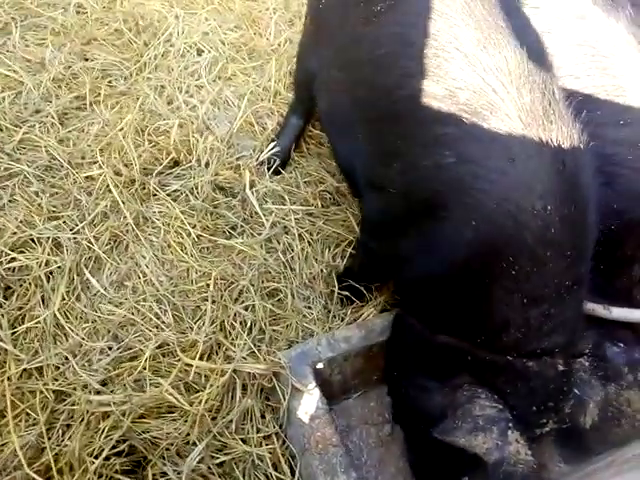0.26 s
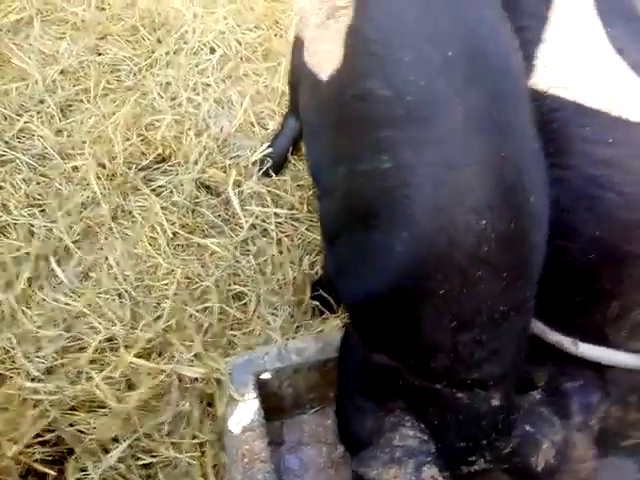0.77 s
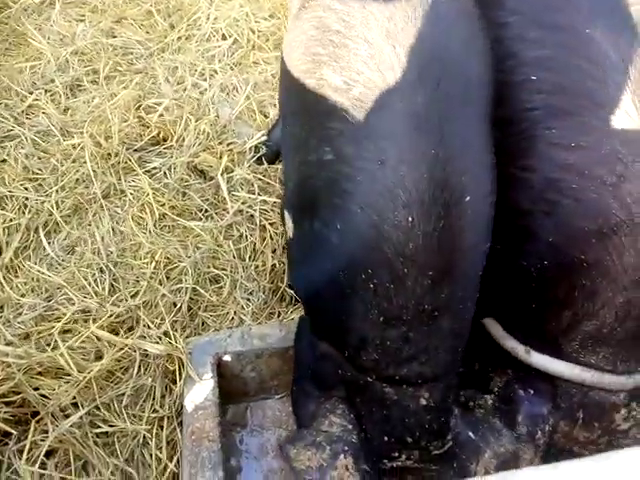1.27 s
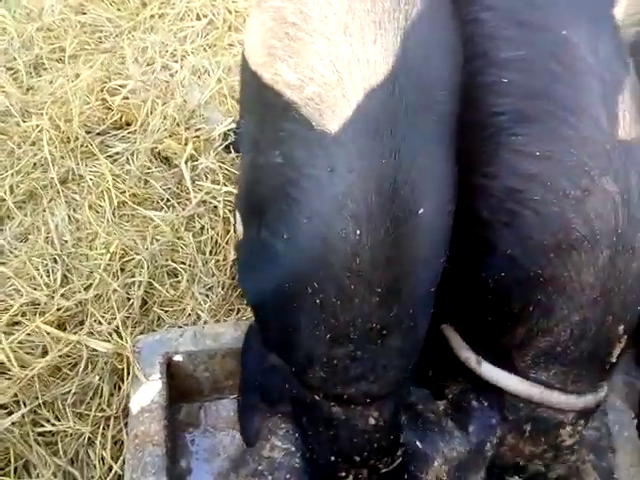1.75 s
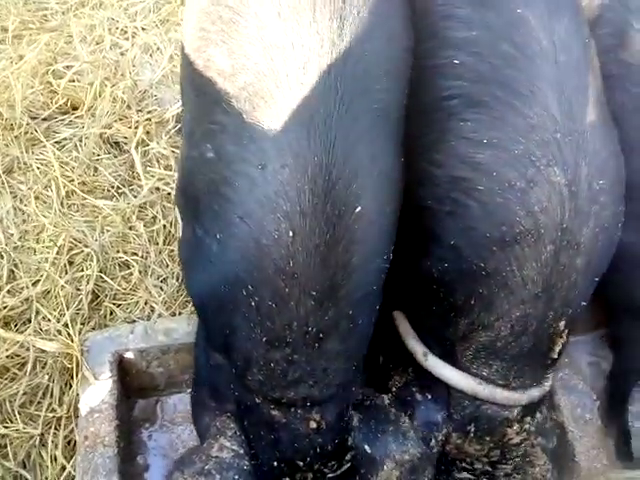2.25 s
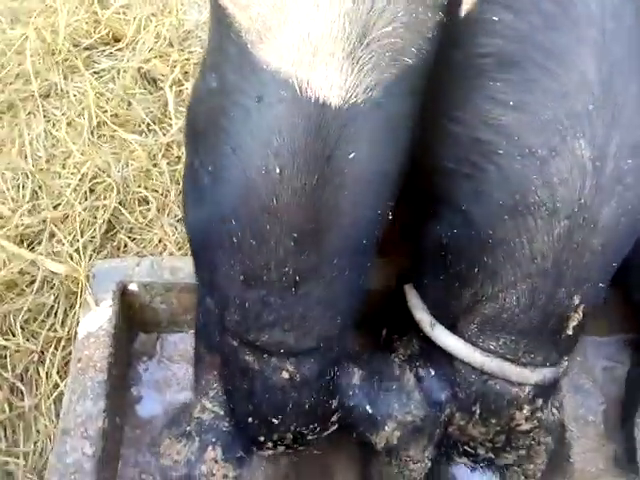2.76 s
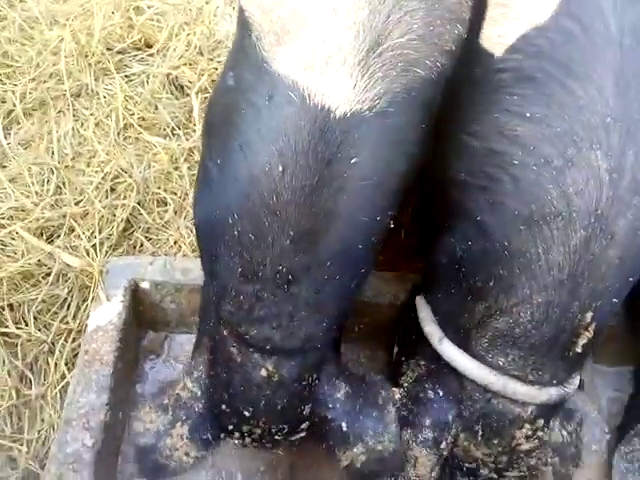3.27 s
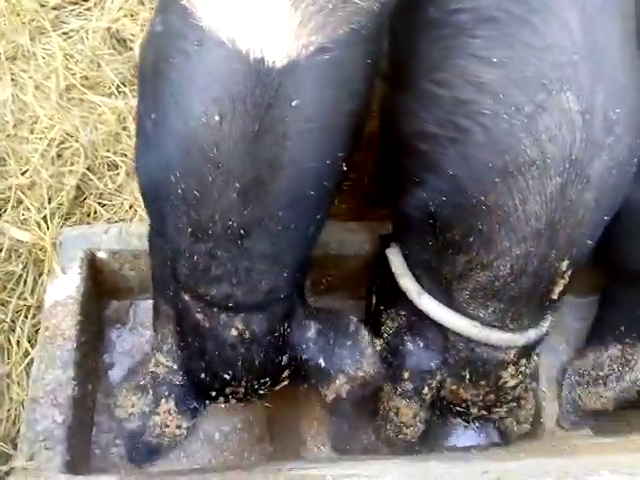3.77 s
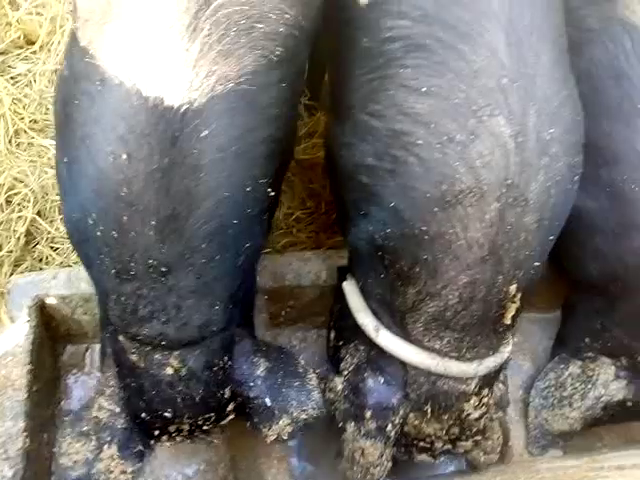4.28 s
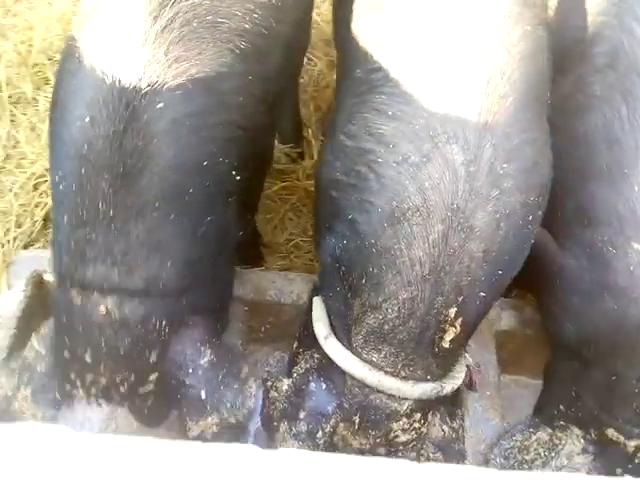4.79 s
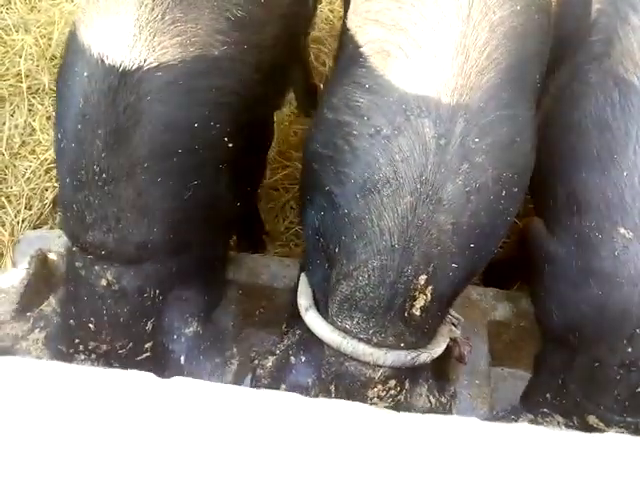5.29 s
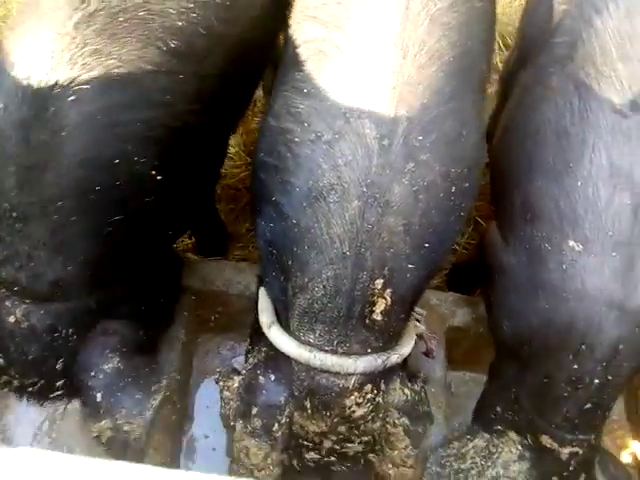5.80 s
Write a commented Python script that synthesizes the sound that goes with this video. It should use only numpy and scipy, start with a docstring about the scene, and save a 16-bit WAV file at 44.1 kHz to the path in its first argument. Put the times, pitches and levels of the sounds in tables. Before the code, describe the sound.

Wet, open-mouthed chewing by pigs, heard very close. It starts at once with a smack and slurp, stays sparse at first, then turns into strong dull chomps, sticky smacks, tiny squeaky whistles and sharp spits. A brief grunt sounds halfway, then the eating continues with lighter smacks. Beneath is a soft low rumble of snouts and bodies, a short pen echo and faint microphone hiss.

```python
"""Right away a jaw closes with a hollow pop and a wet smack: pigs feed on mash from a concrete trough. More
pops, dull knocks and smacks follow, with spits, whistles and one grunt, mostly fading tones. Mash slurps and
bubbles: air noise and many tiny tones swell with each mouthful; spray hisses along. Behind lie a faint echo of
the open pen, a low murmur of snouts and bodies made from coloured noise, the steady hiss of a small, close
microphone and a very faint flicker at the top of the treble."""
import sys
import numpy as np
from scipy import signal
from scipy.fft import rfft, irfft, next_fast_len
from scipy.io import wavfile
from scipy.ndimage import uniform_filter1d, map_coordinates

SR = 44100
rng = np.random.default_rng(int(sys.argv[2]) if len(sys.argv) > 2 else 0)


def dump_mix(stems):
    """Bounce the given channels to the path in sys.argv[1] as a 16-bit WAV at rate SR."""
    frames = np.atleast_2d(stems).T  # one column per channel
    limited = np.clip(frames, -1, 1)  # hard clip at full scale
    pcm = np.round(limited * 32767).astype(np.int16)
    wavfile.write(sys.argv[1], SR, pcm)


def volts_from_db(level):
    """Convert decibel levels to linear amplitude ratios."""
    exponent = np.asarray(level, float) / 20
    return 10 ** exponent


N = 266364  # length in samples


def unit(x):
    """Scaled to rms 1."""
    return x / np.sqrt(np.mean(x ** 2) + 1e-20)


def along(points, hz):
    """Reads a curve of (Hz, value) points on a log frequency axis."""
    f, v = np.transpose(points)
    return np.interp(np.log(hz + 1), np.log(f + 1), v)


def curves(rows):
    """One value per sample for each column after the time."""
    s, *cols = np.transpose(rows)
    return [np.interp(np.arange(N) / SR, s, c) for c in cols]


def wobble(rate):
    """A smooth random curve with rate random points a second."""
    points = rng.standard_normal(int(N * rate / SR) + 4)
    return map_coordinates(points, [np.arange(N) * rate / SR])


def filtered(x, response):
    """Multiplies the spectrum of x by a response that depends on frequency."""
    m = next_fast_len(N + SR // 2)
    return irfft(rfft(x, m) * response(np.fft.rfftfreq(m, 1 / SR)), m)[:N]


def noise(spectrum):
    """Noise of rms 1 with the given colour."""
    return unit(filtered(rng.standard_normal(N), lambda hz: volts_from_db(along(spectrum, hz))))


def tract(x, modes):
    """Sends x through fixed resonances side by side, with alternating sign."""
    def response(f):
        total = 0
        for k, (centre, width, db) in enumerate(modes):
            peak = 1j * f * width / (centre ** 2 - f ** 2 + 1j * f * width)
            total = total + (-1) ** k * volts_from_db(db) * peak
        return total
    return filtered(x, response)


def impulses(s, db):
    """Single-sample clicks at the given times and levels."""
    return np.bincount(np.round(s * SR).astype(int), volts_from_db(db), N)[:N]


def rings(rows, attack, rise, rough, bend=1):
    """Fading tones from rows (s, peak dB, Hz, t60 s); pitch rises as the cavity shrinks, wet walls shake the phase.
    With bend over 1 the tone holds at first, then dies quickly."""
    s, db, hz, t60 = np.transpose(rows)[:, :, None]
    t = np.arange(round(1.2 * t60.max() * SR)) / SR
    shake = np.cumsum(rng.standard_normal((len(s), len(t))), axis=1) * rough * np.sqrt(hz / SR)
    shake = uniform_filter1d(shake, size=24, axis=1)  # smoothed so that each tone stays narrow
    tone = np.sin(2 * np.pi * hz * t * (1 + rise * t / t60) + shake - shake[:, :1])
    shape = volts_from_db(-60 * (t / t60) ** bend) * (1 - np.exp(-t / attack)) ** 2
    shape = volts_from_db(db) * shape / shape.max(axis=1, keepdims=True)
    at = (np.round(s * SR) + np.arange(len(t))).astype(int)
    return np.bincount(at.ravel(), (tone * shape).ravel(), N + SR)[:N]


# Colour of the murmur. Each row: frequency in Hz, relative strength in dB per Hz.
MURMUR = [(25, -28.5), (42, -25.5), (70, -4), (145, 3), (233, -1), (460, -20.5), (600, -41.5), (780, -53.5),
          (1320, -120)]
# Loudness of the murmur over time. Each row: time in seconds, level in dB.
HERD = [(0.0, -60), (0.3, -61), (0.47, -62), (0.67, -53), (0.99, -61.5), (1.31, -59), (1.7, -61.5),
        (1.96, -67.5), (2.45, -65), (2.59, -59.5), (3.11, -58), (3.87, -62), (4.44, -63.5), (4.61, -56),
        (5.01, -60), (5.32, -56), (6.04, -64)]


def murmur():
    """Snouts and bodies of the herd blur into low noise that wavers and follows a loudness curve."""
    wavering = unit(volts_from_db(3.5 * wobble(11)) * noise(MURMUR))
    return volts_from_db(curves(HERD)[0]) * wavering


# How long the echo lasts. Each row: frequency in Hz, time to die by 60 dB in seconds.
PEN = [(150, 0.3), (400, 0.14), (1000, 0.054), (4000, 0.062)]


def pen(x):
    """Trough and pen walls answer; each frequency dies at its own speed, with a new tail every 1/8 second."""
    wet, hop = np.zeros(N + SR), SR // 8
    for start in range(0, N, hop):
        hz, t, z = signal.stft(rng.standard_normal(SR // 3), SR, nperseg=256)
        fade = volts_from_db(-60 * t / along(PEN, hz)[:, None])
        tail = signal.istft(z * fade, SR, nperseg=256)[1]
        tail = np.pad(tail, (round(0.018 * SR), 0))  # the echo starts 18 ms late
        echo = signal.fftconvolve(x[start:start + hop], tail / np.linalg.norm(tail))
        wet[start:start + len(echo)] += echo
    return wet[:N]


def licks():
    """Faint laps of the other mouths at random moments, each lingering on one mouth shape."""
    per_second, floor_db, spread_db, tilt_db_per_octave = 60, -70, 11, -3
    draw = rng.random((round(per_second * N / SR), 4))
    octaves = 3 * draw[:, 1]
    db = floor_db + spread_db * draw[:, 2] ** 2 + tilt_db_per_octave * octaves
    rows = [draw[:, 0] * N / SR, db, 450 * 2 ** octaves, 0.055 + 0.08 * draw[:, 3]]
    return rings(np.transpose(rows), attack=0.008, rise=0.02, rough=0.45)


# Resonances of the throat. Each row: centre in Hz, width in Hz, relative strength in dB.
THROAT = [(330, 100, -2.5), (478, 65, 0), (1400, 240, -10), (1800, 120, -11)]


def grunt():
    """A short voiced grunt: a hum, and uneven glottal pulses with breath through the throat."""
    peak_s, level_db, swell_s, fade_s = 3.122, -39, 0.04, 0.035
    peak_hz, sag_hz_per_s, rasp_db = 158.6, 220, -5.5
    late = np.arange(N) / SR - peak_s
    pitch_hz = peak_hz - sag_hz_per_s * np.clip(late, -swell_s / 2, fade_s / 2)
    phase = np.cumsum(pitch_hz * (1 + 0.0167 * wobble(180))) / SR  # in cycles
    pulses = np.diff(np.floor(phase), prepend=0) * volts_from_db(2.6 * wobble(150))
    hoarse = 0.085 * rng.standard_normal(N) * (1 + np.cos(2 * np.pi * phase))
    hum = np.sqrt(2) * np.sin(2 * np.pi * phase)
    rasp = volts_from_db(rasp_db) * unit(tract(pulses + hoarse, THROAT))
    bell = np.exp(-(late / np.where(late < 0, swell_s, fade_s)) ** 2)
    return volts_from_db(level_db) * bell * (hum + rasp)


# Mouthfuls sucked in. Each row: peak time in seconds, slurp level in dB, spray level in dB,
# swell in seconds, fade in seconds; the slurp climbs or falls 20 dB in the swell or fade time.
SLURPS = [(0.033, -42.5, -55, 0.04, 0.025), (0.301, -50, -62.5, 0.0091, 0.082),
          (0.71, -60.5, -80, 0.086, 0.24), (0.992, -49.5, -64, 0.085, 0.1),
          (1.385, -50.5, -67, 0.065, 0.13), (1.78, -47.5, -64, 0.08, 0.11),
          (2.078, -43, -62.5, 0.054, 0.073), (2.862, -44.5, -59, 0.021, 0.051),
          (3.13, -49.5, -62.5, 0.055, 0.29), (3.275, -69, -59, 0.0091, 0.036),
          (3.394, -62, -64.5, 0.026, 0.3), (3.67, -52, -63, 0.059, 0.0615), (3.714, -47, -54, 0.063, 0.043),
          (3.971, -53.5, -70, 0.0056, 0.15), (4.05, -52, -60, 0.017, 0.16), (4.375, -61, -65, 0.064, .15),
          (4.46, -50.5, -79, 0.065, 0.14), (4.665, -59, -73, 0.024, 0.45),
          (4.752, -50.5, -62, 0.029, 0.045), (4.849, -51.5, -63, 0.054, 0.041),
          (5.029, -60, -68, 0.0071, 0.12), (5.195, -57, -90, 0.083, 0.025),
          (5.27, -51, -74.5, 0.026, 0.023), (5.385, -57, -70, 0.022, 0.069),
          (5.735, -48, -76, 0.024, 0.082), (5.79, -49, -76, 0.067, 0.039)]
# Levels between mouthfuls: slurp in dB, then spray in dB.
REST_DB = [-75, -81.5]


def mouthfuls():
    """Slurp and spray levels in dB: each mouthful swells and fades over a resting level."""
    s, slurp_db, spray_db, swell, fade = np.transpose(SLURPS)[:, :, None]
    t = np.arange(0, N / SR, 0.002)

    def level(db, rest_db, lead_s, quicker):
        late = quicker * (t - s + lead_s)
        each = db - 20 * np.maximum(-late / swell, late / fade)
        return 20 * np.log10(volts_from_db(each).sum(axis=0) + volts_from_db(rest_db))

    slurp_level = level(slurp_db, REST_DB[0], lead_s=0, quicker=1)
    spray_level = level(spray_db, REST_DB[1], lead_s=0.0078, quicker=1.63)  # earlier and briefer
    return curves(np.transpose([t, slurp_level, spray_level]))


# Colour of the spray. Each row: frequency in Hz, relative strength in dB per Hz.
SPRAY = [(1470, -14), (2500, 0.5), (3380, -12.5), (4000, -6.5), (4910, -5.5), (9500, -20.5), (20900, -120)]


def spray(level_db):
    """Hiss through the teeth, each band flickering on its own, and small droplets that ring."""
    z = signal.stft(noise(SPRAY), nperseg=256)[2]
    field = uniform_filter1d(rng.standard_normal(z.shape), size=3, axis=0)
    field = uniform_filter1d(field, size=6, axis=1)
    hiss = signal.istft(z * volts_from_db(4.2 * unit(field)), nperseg=256)[1][:N]
    hiss = unit(volts_from_db(2.5 * wobble(66)) * hiss)
    draw = rng.random((1200, 3))
    hz = 2000 * 3 ** draw[:, 1]
    db = along(SPRAY, hz) - 4 * np.log(np.maximum(draw[:, 2], 0.05))  # a few drops are much louder
    rows = [draw[:, 0] * N / SR, db, hz, 110 / hz]
    drops = rings(np.transpose(rows), attack=0.002, rise=0.01, rough=0.2)
    return volts_from_db(level_db) * (volts_from_db(-3) * hiss + volts_from_db(-3) * unit(drops))


# Resonances of the snout. Each row: centre in Hz, width in Hz, relative strength in dB.
SNOUT = [(385.6, 202, 6.5), (637, 260, 2), (977, 320, 0.5), (1250, 207, 2.5), (1800, 400, -1),
         (2230, 290, -15.5), (2587, 300, -21)]


def breath(rate, patchy_db):
    """Air in the snout; each steep resonance swells and fades on its own as the tongue moves."""
    air = np.zeros(N)
    for centre, width, db in SNOUT:
        once = tract(rng.standard_normal(N), [(centre, width, db)])
        band = tract(once, [(centre, width, 0)])  # twice through makes it steep
        air += volts_from_db(patchy_db * wobble(rate)) * band
    return unit(air)


def slurp(level_db):
    """Mash sucked through the lips: dense small bubbles and air, coloured by the snout."""
    count = 3000
    draw = rng.random((count, 3))
    modes = np.array(SNOUT)[(draw[:, 1] * len(SNOUT)).astype(int)]
    hz = np.clip(modes[:, 0] + 0.5 * modes[:, 1] * rng.standard_normal(count), 250, None)
    size_db = modes[:, 2] - 3 * np.log(np.maximum(draw[:, 2], 0.08))
    rows = [draw[:, 0] * N / SR, size_db, hz, 22 / hz]
    bubbles = rings(np.transpose(rows), attack=0.008, rise=0.051, rough=0.31)
    air = breath(rate=28, patchy_db=4)
    return volts_from_db(level_db) * (volts_from_db(-9.5) * unit(bubbles) + volts_from_db(-6.5) * air)


# Spits of air and feed through the teeth. Each row: start in seconds, peak level in dB, centre in Hz.
SPITS = [(0.027, -57, 2410), (0.305, -58, 6660), (0.306, -60, 2480), (0.707, -58, 7080),
         (0.975, -58.5, 2560), (2.0342, -54.5, 5500), (2.053, -53.5, 3740), (2.073, -64, 3800),
         (2.4526, -59, 5900), (2.86, -56.5, 3775), (3.119, -62, 4730), (3.194, -55, 5190),
         (3.196, -61, 7930), (3.2507, -50, 4880), (3.252, -56, 3700), (3.3745, -47.5, 4150),
         (3.415, -60, 3470), (3.673, -55.5, 5300), (4.004, -54, 4850), (4.0377, -50.5, 4860),
         (4.045, -66, 2650), (4.178, -61.5, 3300), (4.329, -60.5, 4980), (4.359, -60, 2597),
         (4.452, -58, 7350), (4.464, -53, 7040), (4.802, -65, 7500), (5.0236, -58.5, 4530),
         (5.026, -66, 2800), (5.679, -60.5, 2845), (5.7075, -60, 5130), (5.733, -62.5, 7130),
         (5.757, -63.5, 4420), (5.937, -63.5, 4750), (6.027, -66, 4800)]


def spits():
    """Short rough whistles through the teeth: fainter side tones, a broad crack and a thin lingering tone."""
    side_hz = rng.uniform(1800, 8500, (len(SPITS), 6))  # six side tones at random pitches
    sides = [(s, db - 11.5, hz, 0.035) for (s, db, _), row in zip(SPITS, side_hz) for hz in row]
    main = [(s, db, hz, 0.04) for s, db, hz in SPITS]
    short = rings(main + sides, attack=0.003, rise=0.0082, rough=0.4, bend=1.3)
    thin = [(s, db - 14.5, hz, 0.16) for s, db, hz in SPITS]
    linger = rings(thin, attack=0.0044, rise=0.005, rough=0.15)
    s, db, _ = np.transpose(SPITS)
    t = np.arange(SR // 10) / SR
    burst = volts_from_db(-60 * t / 0.045) * (1 - np.exp(-t / 0.004)) ** 2
    crack = signal.fftconvolve(impulses(s, db - 9), burst)[:N]
    bright_noise = unit(np.diff(rng.standard_normal(N + 1)))
    return short + linger + crack * bright_noise


# Air squeezed between closed lips sings for a moment. Each row: start in seconds, peak level in dB,
# starting pitch in Hz, time to die by 60 dB in seconds.
WHISTLES = [(1.674, -45, 1300, 0.044), (2.285, -65.5, 890, 0.16), (2.758, -43, 1780, 0.024),
            (3.385, -54, 1192, 0.039), (3.953, -51, 1257, 0.04), (4.113, -46.5, 2700, 0.024),
            (4.13, -65, 1180, 0.1), (4.174, -63, 2074, 0.06), (4.829, -49.5, 1800, 0.08),
            (4.85, -50, 1520, 0.031), (5.162, -58, 1656, 0.034)]


def whistles():
    """Squeezed air sings as brief tones that hold, then die quickly."""
    return rings(WHISTLES, attack=0.0024, rise=0.012, rough=0.4, bend=2.5)


# Lip smacks. Each row: start in seconds, low tone's peak level in dB and starting pitch in Hz,
# high tone's peak level in dB and starting pitch in Hz.
SMACKS = [(0.031, -45, 890, -49, 1530), (0.301, -44, 960, -54, 1950), (0.71, -44, 913, -54, 1600),
          (0.931, -46, 840, -86.5, 1730), (0.98, -48.5, 750, -55, 1940), (1.034, -49.5, 806, -60, 1950),
          (1.377, -31.5, 943, -75, 1750), (1.419, -44, 1080, -50.5, 2180),
          (1.763, -37.5, 1169, -51.5, 1480), (1.775, -34, 1155, -48.5, 2230),
          (2.055, -34.5, 644, -43, 1287), (2.094, -46.5, 990, -50, 1500), (2.454, -59, 1165, -55, 1987),
          (2.475, -35, 713, -49.5, 1255), (2.518, -41, 598.5, -59, 1400), (2.796, -49, 1340, -49.5, 1840),
          (2.85, -48.5, 800, -52, 1690), (2.858, -46, 1056, -50, 1774), (3.113, -54, 1320, -50, 1740),
          (3.135, -44, 1400, -50, 2360), (3.198, -45, 1260, -62, 1650), (3.221, -47, 1025, -62, 1800),
          (3.251, -46.5, 800, -50.5, 2410), (3.266, -35.5, 1019, -45.5, 1665),
          (3.329, -54, 1250, -58, 1900), (3.374, -53, 1125, -51, 2085), (3.412, -55, 1250, -53, 2100),
          (3.613, -50.5, 945, -57, 2100), (3.658, -49, 1176, -56, 2070), (3.695, -59, 1200, -48.5, 2090),
          (4.046, -37.5, 1270, -51, 1982), (4.057, -46, 1187, -47, 1720), (4.202, -48.5, 940, -67, 1710),
          (4.357, -48.5, 1240, -52.5, 1700), (4.381, -46.5, 1292, -54, 1980),
          (4.449, -69, 720, -37.5, 1790), (4.466, -41.5, 866, -41.5, 1765), (4.466, -43, 1250, -46.5, 2240),
          (4.652, -50, 1860, -59, 2300), (4.712, -58, 1180, -54, 1770), (4.746, -33.5, 943, -56, 1670),
          (4.847, -49.5, 1150, -44.5, 1803), (4.859, -48, 990, -61, 1400), (5.035, -47, 1250, -54.5, 1617),
          (5.11, -49.5, 812, -47.5, 1493), (5.193, -49, 1070, -50.5, 1585), (5.253, -52.5, 1300, -73, 2000),
          (5.28, -55, 790, -55, 1276), (5.374, -51.5, 770, -57.5, 1570), (5.392, -57, 1100, -59, 2000),
          (5.473, -47.5, 733, -81, 1910), (5.619, -56, 956, -60, 1900), (5.673, -48.5, 1550, -54, 2090),
          (5.714, -42.5, 898, -56, 1880), (5.731, -47, 800, -49, 1480), (5.751, -44.5, 840, -59, 1500),
          (5.774, -49, 1230, -46, 1700), (5.8, -44, 1197, -58, 1980), (6.013, -56, 1160, -60, 1800)]


def smacks():
    """Each wet smack of the lips rings two snout resonances."""
    s, low_db, low_hz, high_db, high_hz = np.transpose(SMACKS)
    low_rows = np.transpose([s, low_db, low_hz, 19 / low_hz])
    high_rows = np.transpose([s, high_db, high_hz, 40 / high_hz])
    low = rings(low_rows, attack=0.00072, rise=0.015, rough=0.45, bend=1.15)
    high = rings(high_rows, attack=0.002, rise=0.02, rough=0.45, bend=1.5)
    return low + high


def squelches():
    """The lips tear from the mash at each smack or whistle: a short puff of air through the snout."""
    smack_s, low_db, _, high_db, _ = np.transpose(SMACKS)
    whistle_s, whistle_db, _, _ = np.transpose(WHISTLES)
    s = np.concatenate([smack_s, whistle_s])
    db = np.concatenate([np.maximum(low_db, high_db), whistle_db])
    t = np.arange(SR // 10) / SR
    puff = volts_from_db(-60 * t / 0.051) * (1 - np.exp(-t / 0.0026))
    puffs = signal.fftconvolve(impulses(s, db), puff)[:N]
    return volts_from_db(-9) * puffs * breath(rate=120, patchy_db=4)


# Snout knocks on the trough. Each row: start in seconds, peak level in dB, starting pitch in Hz.
KNOCKS = [(2.073, -24, 248), (2.093, -34, 270), (2.103, -36.5, 242.7)]


def knocks():
    """Short dull knocks of a snout on the trough that die within about four cycles, without rebounds."""
    rows = [(s, db, hz, 4.1 / hz) for s, db, hz in KNOCKS]
    return rings(rows, attack=0.0017, rise=0.016, rough=0.1, bend=2.0)


# Jaw closures. Each row: start in seconds, peak level in dB, starting pitch of the mouth cavity in Hz.
CHOMPS = [(0.027, -39.5, 550), (0.307, -37, 272), (0.694, -39, 378), (0.708, -27.5, 282),
          (0.846, -43.5, 206), (0.974, -46, 321.6), (1.008, -46, 262), (1.373, -40.5, 205),
          (1.3769, -33.5, 397.3), (1.405, -38.5, 318), (1.418, -48, 383), (1.764, -40, 281),
          (1.777, -23.5, 270), (1.799, -31.5, 299), (2.053, -27, 290), (2.453, -42, 290), (2.476, -26, 354),
          (2.531, -44, 330), (2.865, -19, 302.6), (3.268, -26, 279), (3.357, -46, 310), (3.663, -45, 306),
          (3.708, -44.5, 520), (4.047, -31.5, 473), (4.448, -32.5, 308), (4.467, -21.5, 285.4),
          (4.662, -45, 233), (4.745, -33.5, 526), (4.745, -39, 232.8), (4.878, -42.5, 230),
          (5.11, -42.5, 317), (5.263, -38.5, 311), (5.276, -41, 243.7), (5.714, -41.5, 250)]


def pops():
    """The mouth cavity pops as the jaws close; the cheeks slap twice more, weaker each time."""
    rebound_s, rebound_loss_db, detune = 0.019, 12, 0.055
    cycles = 10  # a pop dies by 60 dB within about this many cycles
    chance = rng.standard_normal((len(CHOMPS), 3, 3))
    rows = []
    for (s, db, hz), draws in zip(CHOMPS, chance):
        for k, (timing, pitch, force) in enumerate(draws):  # k = 0 is the pop itself, left as listed
            slap_s = s + k * rebound_s * (1 + 0.133 * timing)
            slap_db = db - k * rebound_loss_db + min(k, 1) * 2 * force
            slap_hz = hz * (1 + k * detune * pitch)
            rows.append((slap_s, slap_db, slap_hz, cycles / slap_hz))
    return rings(rows, attack=0.0015, rise=0.04, rough=0.28, bend=1.59)


def scene():
    """All mouths, their echo, and the low murmur of the herd."""
    slurp_db, spray_db = mouthfuls()
    mouths = licks() + grunt() + spray(spray_db) + slurp(slurp_db)
    mouths += spits() + whistles() + smacks() + squelches() + knocks() + pops()
    return (murmur() + volts_from_db(-13.5) * pen(mouths) + mouths)[None]


# Colour of the faint top treble. Each row: frequency in Hz, relative strength in dB per Hz.
TOP_TREBLE = [(13500, -40), (14300, -4), (15200, 1), (15600, -4.5), (15800, -42)]


def top_treble():
    """A very faint band of noise near 15 kHz whose level flickers."""
    level_db = -86.5 + 1.2 * wobble(9.2) + 1.2 * wobble(66)
    return volts_from_db(level_db) * noise(TOP_TREBLE)


# Response of the microphone. Each row: frequency in Hz, gain in dB.
MIC = [(25, -9.5), (45, -4), (70, 5.5), (6800, -9), (8200, -13.5), (10000, -11.5), (13600, -23.5),
       (15000, -6)]
# Colour of its hiss. Each row: frequency in Hz, relative strength in dB per Hz.
HISS = [(25, -1.5), (100, 1), (300, -3.5), (1000, -16.5), (3000, -20), (6000, -21.5), (7200, -26.5),
        (8200, -33.5), (13800, -33.5), (15600, -34), (15800, -64)]


def microphone(dry):
    """The microphone weakens deep bass and treble and adds a steady hiss."""
    heard = filtered(dry[0], lambda hz: volts_from_db(along(MIC, hz)))
    return heard + volts_from_db(-67.5) * noise(HISS)


def top_cut(x):
    """Nothing passes above the cut-off."""
    return signal.sosfilt(signal.butter(12, 15680, fs=SR, output="sos"), x)


def record(dry):
    """The scene as the small microphone picks it up, with the faint top treble."""
    mix = (microphone(dry) + top_treble())[None]
    return top_cut(mix)


dry = scene()
out = record(dry)
dump_mix(out)
```